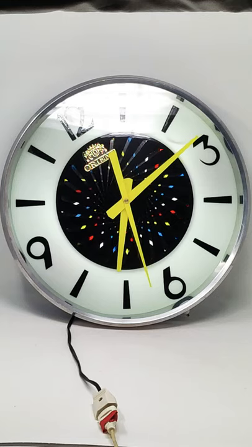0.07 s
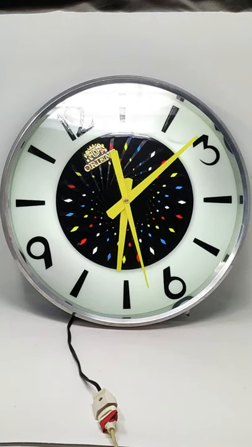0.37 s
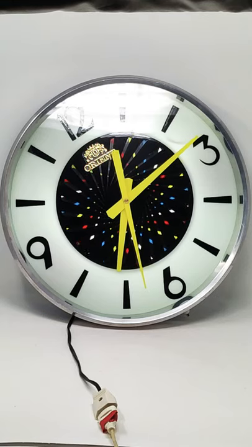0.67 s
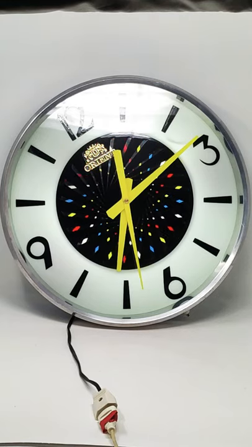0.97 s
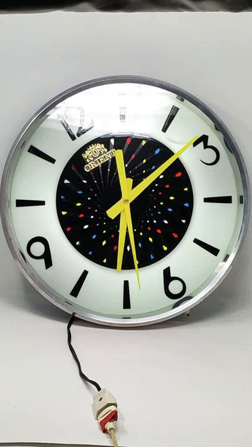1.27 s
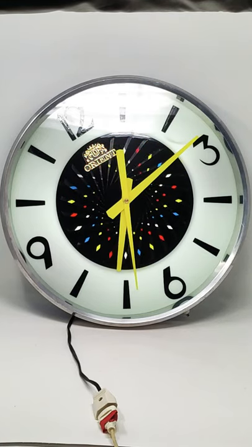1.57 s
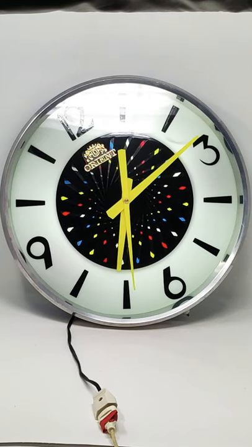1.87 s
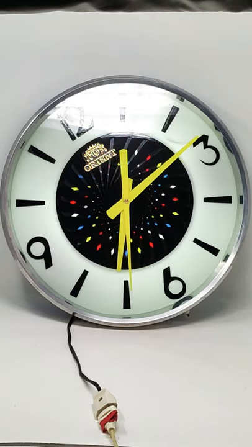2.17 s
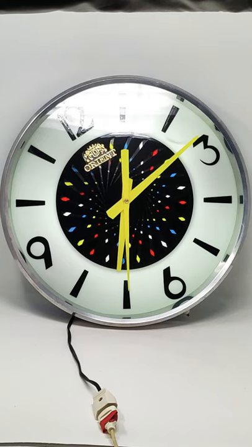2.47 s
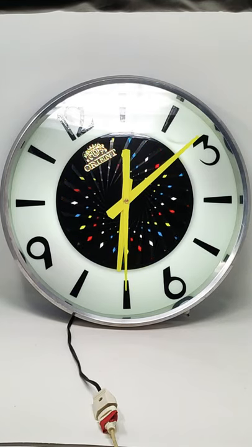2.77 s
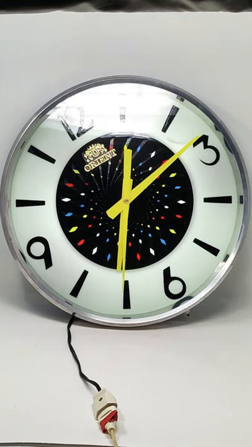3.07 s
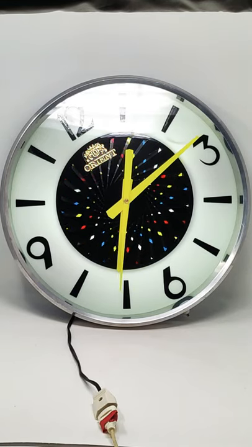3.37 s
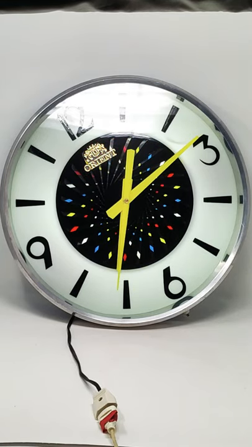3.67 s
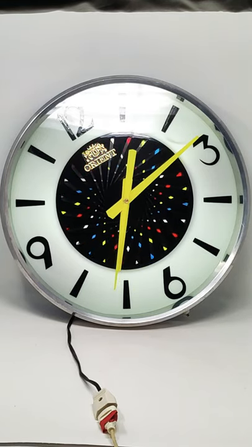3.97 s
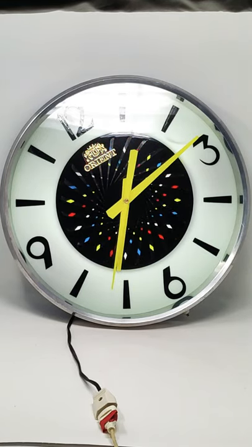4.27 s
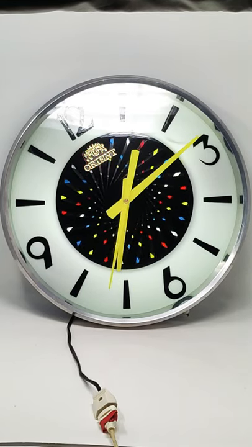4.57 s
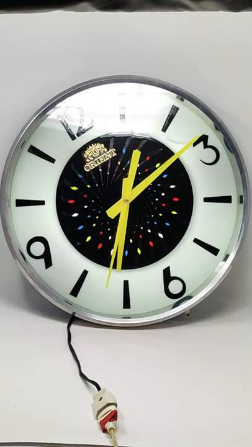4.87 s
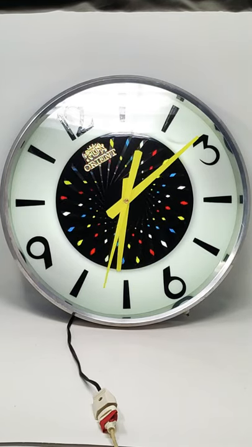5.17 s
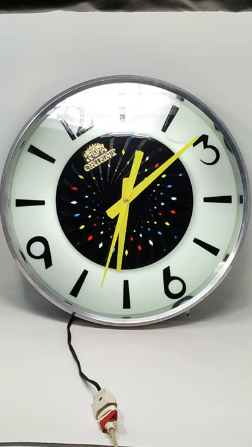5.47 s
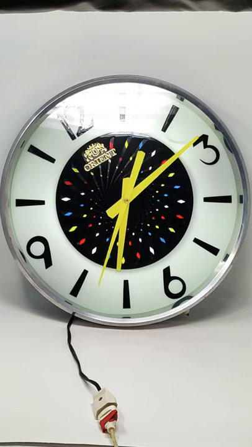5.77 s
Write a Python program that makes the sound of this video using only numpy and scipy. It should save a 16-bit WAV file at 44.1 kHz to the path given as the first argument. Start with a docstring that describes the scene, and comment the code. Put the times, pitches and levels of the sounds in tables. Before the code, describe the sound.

Close, uneven wind buffeting dominates, rumbling and popping mainly on the left side of the microphone. It drops briefly about two thirds of the way through and then returns. Behind it, indoors, a plug-in wall clock gives very faint metallic ticks, lower tocks and dry gear clicks over a slight hum and room hiss. One light snap sounds before the middle, and a tiny ping near the end.

```python
"""A quiet room with a plugged-in wall clock, and a draught blowing across the microphone's two ports.
Up front the air rumbles, thumps and flutters as eddies and gusts hit the ports, mostly the left one.
Far beneath it the clock ticks softly twice a second and tocks once a second, thin metal ringing with
each beat, while its gear teeth click dryly in the case. One sharper snap and one small ping stand out
from a bed of faint motor hum and room hiss."""
import sys
import numpy as np
from scipy import signal
from scipy.fft import rfft, irfft, next_fast_len
from scipy.io import wavfile
from scipy.ndimage import uniform_filter1d

SR = 44100
rng = np.random.default_rng(int(sys.argv[2]) if len(sys.argv) > 2 else 0)


def store_wav(level_fs):
    """Save 16-bit WAV to argv[1]."""
    pcm = np.round(np.clip(np.atleast_2d(level_fs), -1, 1) * 32767)
    wavfile.write(sys.argv[1], SR, pcm.T.astype(np.int16))


N = 265923
T = np.arange(N) / SR


def amp(db):
    """Decibels to gain."""
    return 10 ** (np.asarray(db) / 20)


def unit(x):
    """Scales to an rms of one."""
    return x / np.sqrt(np.mean(x ** 2) + 1e-20)


def colour(x, points):
    """An EQ curve through (Hz, dB) points joined on a log axis."""
    hz, db = np.transpose(points)
    f = np.fft.rfftfreq(x.shape[-1], 1 / SR)
    return irfft(rfft(x) * amp(np.interp(np.log(f + 1), np.log(hz), db)), x.shape[-1])


def noise(points, size=N):
    """Unrelated coloured noise for the two ports, with an rms of one."""
    return unit(colour(rng.standard_normal((2, next_fast_len(size))), points)[:, :size])


def wander(rate):
    """A smooth random modulator with an rms of one, up to about rate changes a second."""
    size = next_fast_len(N)
    f = np.fft.rfftfreq(size, 1 / SR)
    return unit(irfft(rfft(rng.standard_normal(size)) * np.exp(-(f / rate) ** 2), size)[:N])


def steadied(x, span):
    """Levels out swells slower than span seconds."""
    return x / np.sqrt(abs(uniform_filter1d(x ** 2, int(span * SR))) + 1e-6)


def swell(s, width):
    """A bell-shaped envelope of height one around s seconds."""
    return np.exp(-.5 * ((T - s) / width) ** 2)


def sides(pan_db):
    """Left and right gains of constant power."""
    gains = np.array([amp(pan_db / 2), amp(-pan_db / 2)]).reshape(2, -1)
    return gains / np.sqrt(np.mean(gains ** 2, 0))


def add(mix, s, sound):
    """Mixes a sound in at s seconds."""
    part = mix[..., max(round(s * SR), 0):][..., :sound.shape[-1]]
    part += sound[..., :part.shape[-1]]


# The colour of the room tone. Each row: frequency in Hz, relative level in dB.
ROOM_EQ = [(30, 22), (150, 13), (250, 16), (400, 9), (550, 4.5), (1000, 0.5), (2200, -2.5), (3200, -7.5),
           (4400, -12), (6000, -15), (8200, -12.5), (8800, -19.5), (10500, -21), (11300, -15.5),
           (13400, -13), (15000, -14.5)]


def room(level_db=-52, flicker_db=1.0):
    """A soft bed of hiss whose level flickers slightly."""
    return amp(level_db + flicker_db * wander(27)) * noise(ROOM_EQ)


# The tones of the hum. Each row: pitch in Hz, level in dB, pan as left minus right in dB.
HUM_TONES = [(213, -77.5, 8), (295.4, -57.5, -3.5), (389, -76.5, -8), (1146, -78, 23), (2460, -89.5, -8)]


def hum(waver_db=1.7, drift_hz=3.24):
    """The motor and the room hold faint tones that waver in pitch and level."""
    out = np.zeros((2, N))
    for hz, db, pan_db in HUM_TONES:
        turns = np.cumsum(hz + drift_hz * wander(6.84)) / SR + rng.random()
        out += sides(pan_db) * amp(db + waver_db * wander(4.4)) * np.sqrt(2) * np.sin(2 * np.pi * turns)
    return out


def click(points, t60, tail_db, tail_t60, rise_s, grain_db):
    """A burst of tiny uneven contacts that dies fast, and the room's tail."""
    t = np.arange(SR // 3) / SR
    decay = amp(-60 * t / t60) + amp(tail_db - 60 * t / tail_t60)
    attack = 1 - np.exp(-t / rise_s)
    contacts = rng.standard_normal((2, len(t)))
    contacts *= amp(grain_db * np.minimum(rng.exponential(1, contacts.shape), 4))
    return unit(colour(contacts, points)) * attack * decay


# The snap's cue: start in seconds, relative level in dB.
SNAP_CUE = (2.2549, -50.5)
# The snap's colour. Each row: frequency in Hz, relative level in dB.
SNAP_EQ = [(400, -4), (880, 2), (1150, 3.5), (1380, 11), (1600, 3.5), (1830, 11), (2100, -0.5), (2500, 1),
           (2780, -1), (3050, 4), (3450, 2.5), (3700, -6), (3880, -5), (4220, -21), (4500, -8.5),
           (5300, -8), (5800, -15), (6350, -6.5), (8000, -4.5), (9700, -17), (11800, -7), (13800, -8),
           (15500, -26.5)]


def snap():
    """One sharp, broad snap, heard mostly through the room."""
    out = np.zeros((2, N))
    s, db = SNAP_CUE
    burst = click(SNAP_EQ, t60=0.31, tail_db=-1.5, tail_t60=0.31, rise_s=0.00085, grain_db=1.5)
    add(out, s, amp(db) * burst)
    return out


# Teeth that catch and slip home with a clear click. Each row: start in seconds, relative level in dB.
TOOTH_CATCHES = [(0.131, -63.5), (0.3053, -60), (0.5138, -59), (0.703, -58), (0.915, -63.5), (1.1004, -64),
                 (1.505, -57.5), (2.9152, -54.5), (3.103, -55.5), (3.313, -55.5), (3.504, -59.5),
                 (3.7124, -57), (3.9105, -58), (4.014, -61), (4.21, -66), (4.4563, -60.5), (4.699, -57),
                 (5.1416, -58), (5.206, -61), (5.3138, -76)]
# The faint pulse of the other teeth: first pass in seconds, period in seconds.
TOOTH_PULSE = (0.311, 0.2)
# The bright colour of a tooth click. Each row: frequency in Hz, relative level in dB.
TOOTH_EQ = [(1200, -31.5), (2500, 2.5), (3500, 7), (5000, 8.5), (6700, 5.5), (8300, 3), (9500, -14),
            (11300, -6), (13000, -8.5), (15500, -28.5)]
# The clock case's resonances. Each row: centre in Hz, width in Hz, boost in dB before case_ring scales it.
CASE_MODES = [(3070, 50, 8.5), (3200, 50, 9.5), (3560, 42, 9.5), (3890, 51, 7.5), (4160, 87, 5.5),
              (4780, 32, 9), (5020, 71, 8), (5495, 50, 5), (5970, 50, 4), (6620, 55, 10.5), (6894, 54, 8),
              (8170, 160, 11), (9400, 120, 18), (11130, 130, 12)]


def gears(level_db=-4.5, case_ring=1.09, tooth_db=-65, between_db=-70, spread_db=0.7):
    """The wheels click dryly, with fainter clicks halfway between teeth; the case rings with each."""
    out = np.zeros((2, N))
    first, period = TOOTH_PULSE
    faint = [(s, (between_db if k % 2 else tooth_db) + spread_db * rng.standard_normal())
             for k, s in enumerate(np.arange(first, T[-1], period / 2))]
    for s, db in TOOTH_CATCHES + faint:
        tooth = click(TOOTH_EQ, t60=0.097, tail_db=-9.0, tail_t60=0.76, rise_s=0.0022, grain_db=7.5)
        add(out, s, amp(db + level_db) * tooth)
    f = np.fft.rfftfreq(N, 1 / SR)
    resonances = sum((amp(db) - 1) / (1 + 2j * (f - hz) / width) for hz, width, db in CASE_MODES)
    return irfft(rfft(out) * (1 + case_ring * resonances), N)


# Thin metal in the movement. Each row: ratio to the ring pitch, relative level in dB, t60 in seconds.
METAL_MODES = [(0.9, -7, 0.15), (0.953, -7, 0.37), (0.984, -5, 0.22), (1.005, -1.5, 0.2), (1.02, -2, 0.14),
               (1.106, -9, 0.26), (1.131, -8, 0.1)]


def strikes(rows, level_db, width_hz, t60, ring_db, lead_s=0.0095, lead_db=-6, tail_db=-8, tail_t60=0.33):
    """A light touch, then the hit itself: a narrow noise burst that leaves thin metal ringing."""
    out, t = np.zeros((2, N)), np.arange(SR // 3) / SR
    f = np.fft.rfftfreq(len(t), 1 / SR)
    after = np.maximum(t - lead_s, 0)
    attack = np.where(t < lead_s, amp(lead_db), 1) * np.minimum(t / 0.00073, 1)
    lag = np.array([[0], [np.pi / 2]])  # the ring reaches the right port a quarter cycle later
    for s, db, hz, pan_db in rows:
        band = 1 / (1 + 2j * (f - hz) / width_hz) ** 2
        band_noise = irfft(rfft(rng.standard_normal((2, len(t)))) * band, len(t))
        burst = steadied(unit(band_noise), span=0.012)
        burst *= amp(-60 * after / t60) + amp(tail_db - 60 * after / tail_t60)
        ring = sum(amp(ring_db + mode_db - 60 * after / decay) * np.sin(2 * np.pi * ratio * hz * t - lag)
                   for ratio, mode_db, decay in METAL_MODES)
        add(out, s - lead_s, amp(db + level_db) * sides(pan_db) * attack * (burst + ring))
    return out


def beats(first, period, hz, levels, detune=0.003, sway_db=-4.5):
    """Evenly spaced cues for strikes(), each nudged at random in pitch and pan."""
    starts = first + period * np.arange(len(levels))
    pitch, pan = rng.standard_normal((len(levels), 2)).T
    return list(zip(starts, levels, hz * (1 + detune * pitch), sway_db * pan))


# The clock's two pulses. Each gives: first beat in seconds, period in seconds, ring pitch in Hz.
TICK_PULSE = (0.55, 0.5015, 2565)
TOCK_PULSE = (0.399, 0.9995, 2105)
# Their accents. Each entry: one beat's relative level in dB.
TICK_ACCENTS = [-1.7, -2, 0.74, -1, 1, 1, -1.1, 0.28, 0.92, -1, 0.5]
TOCK_ACCENTS = [-2.5, -7, -1, -1, -4]
# The ping. Its row: time in seconds, relative level in dB, ring pitch in Hz, left minus right in dB.
PING_CUE = [(5.838, -69.5, 3130, 0)]


def movement():
    """The clock beats with a ringing tick and a lower, drier tock; a small part pings once."""
    tick = strikes(beats(*TICK_PULSE, TICK_ACCENTS), level_db=-68.0, width_hz=430, t60=0.22, ring_db=12.5)
    tock = strikes(beats(*TOCK_PULSE, TOCK_ACCENTS), level_db=-64.5, width_hz=400, t60=0.055, ring_db=6.0)
    ping = strikes(PING_CUE, level_db=-1.0, width_hz=800, t60=0.1, ring_db=7.0)
    return tick + tock + ping


# Short vortex trains. Each row: centre in seconds, level in dB, pitch in Hz, half length in seconds.
VORTEX_TRAINS = [(0.414, -35.5, 320, 0.0079), (0.995, -24.5, 300, 0.0051), (1.868, -17, 178, 0.015),
                 (1.87, -34, 380, 0.0071), (1.988, -15, 347, 0.002), (3.3907, -14, 342, 0.0017),
                 (4.7055, -13, 347, 0.0013), (5.193, -31.5, 562, 0.0029)]


def flutter(sag_per_s=6):
    """Vortices shed at a slowing rate give brief hollow notes at the left port."""
    left = np.zeros(N)
    for s, db, hz, width in VORTEX_TRAINS:
        turns = hz * (1 - np.exp(-sag_per_s * np.clip(T - s, -.1, .1))) / sag_per_s
        left += amp(db) * swell(s, width) * np.cos(2 * np.pi * turns)
    return np.array([left, np.zeros(N)])


# Gusts that hit the left port. Each row: time in seconds, relative peak in dB, sharpness in Hz.
GUSTS = [(0.283, -13, 154.5), (0.428, -11, 135), (0.55, -8, 156), (0.562, -12.5, 144.5), (0.602, -8, 113),
         (0.717, -11.5, 106.6), (0.775, -10.5, 69), (0.836, -4, 93.5), (0.991, -8.5, 159),
         (1.0042, -4.5, 225), (1.019, -6.5, 116.5), (1.0306, -2.5, 108), (1.068, -12.5, 111),
         (1.104, -13, 214), (1.122, -7.5, 183), (1.257, -18.5, 213), (1.55, -11.5, 126.6),
         (1.574, -15, 244), (1.666, -10.5, 212), (1.675, -3.5, 97), (1.699, -17, 233), (1.922, -6.5, 119.6),
         (1.9941, -7, 175), (2.004, 0, 258), (2.062, -8, 93), (2.158, -5.5, 170), (2.19, -9.5, 223),
         (2.199, -8.5, 170), (2.214, -12.5, 170.5), (2.336, -14.5, 94.6), (2.566, -15, 180),
         (2.591, -7.5, 171), (2.6, -7.5, 112.4), (2.613, -9, 129), (2.659, -10, 139), (2.673, -5.5, 136),
         (2.688, -4.5, 197), (2.724, -7, 116), (2.748, -19.5, 201), (2.764, -4, 58.7), (2.901, -12.5, 188),
         (3.039, -11.5, 165), (3.227, -7.5, 123), (3.287, -16.5, 90.5), (3.333, -8, 184.4),
         (3.363, -10.5, 194), (3.3895, -8, 251), (3.434, -5.5, 128), (3.458, -14.5, 91), (3.502, -3, 338),
         (3.512, -3.5, 219), (3.616, -20.5, 188.5), (3.634, -9.5, 76.3), (3.649, -8, 181), (3.675, -5, 113),
         (3.718, -11.5, 165), (3.738, -15, 170), (3.794, -7, 74), (3.933, -11.5, 143.4), (4.094, -14, 61),
         (4.141, -11.5, 59.6), (4.304, -15.5, 168), (4.465, -7, 109.3), (4.669, -9, 119.3),
         (4.7059, -6.5, 273), (4.728, -9, 236), (4.756, -10.5, 167.5), (4.84, -9.5, 180.4),
         (4.851, -8, 136.6), (4.882, -12, 181), (5.021, -6.5, 110), (5.047, -8, 182), (5.066, -6, 103),
         (5.119, -8.5, 116), (5.191, -7, 159.4), (5.214, -12, 185), (5.227, -8, 141.5), (5.264, -9, 134),
         (5.289, -12, 119), (5.344, -14.5, 139), (5.364, -12, 183.4), (5.396, -8, 169), (5.428, -9, 102.5),
         (5.483, -7, 93.5), (5.743, -10.5, 145), (5.76, -9.5, 152), (5.785, -14.5, 201),
         (5.957, -6.5, 138.5)]


def thumps(level_db=-1.5, leak_hz=40, right_db=-30, finest_ratio=6.62, finest_growth=0.46, lean=0.19):
    """Each gust is a rounded, slightly lopsided cusp of pressure; the port leaks, so a dip follows."""
    pressure, size = np.zeros(N), 4096
    f = np.fft.rfftfreq(size, 1 / SR)
    for s, db, hz in GUSTS:
        top_hz = finest_ratio * hz * amp(finest_growth * db)  # sharper, stronger gusts shed finer swirls
        cusp = np.fft.fftshift(irfft(np.exp(-f / hz - (f / top_hz) ** 3 - 1j * lean)))
        add(pressure, s - size / 2 / SR, amp(db) * cusp / cusp.max() * np.hanning(size))
    leaked = signal.lfilter(*signal.butter(1, leak_hz, "high", fs=SR), pressure)
    return amp(level_db) * leaked * amp([[0], [right_db]])


def gust_swells(push_db=-12.0, wake_db=-27, width_s=0.01508, lead_s=0.0024, pivot_hz=140, wake_tilt=0.53):
    """Power envelopes around the gusts: blunt ones push the rumble, sharp ones stir a wake of eddies."""
    push, wake = np.zeros((2, N))
    for s, db, hz in GUSTS:
        power = (amp(db) * swell(s - lead_s, width_s)) ** 2
        push += power * amp(push_db) ** 2 * pivot_hz / hz
        wake += power * (amp(wake_db) * (hz / pivot_hz) ** wake_tilt) ** 2
    return push, wake


# The draught's fader rides, overall and at the sheltered right port.
# Each row: time in seconds, relative level in dB.
DRAUGHT_RIDE = [(0.15, -23), (0.45, -19.5), (1.05, -18), (1.15, -22.5), (1.45, -20), (1.85, -17.5),
                (2.4, -20), (2.65, -18.5), (3.1, -18.5), (3.3, -15), (3.75, -17.5), (3.88, -25.5),
                (4.05, -26), (4.35, -26.5), (4.58, -25.5), (4.75, -17.5), (5.45, -17), (5.6, -22),
                (5.9, -17.0), (6.02, -22.5)]
LEE_RIDE = [(0.2, -43.5), (0.7, -35.5), (1.0, -35.5), (2.9, -40), (3.4, -30), (3.9, -34), (4.15, -41.5),
            (4.4, -32.5), (4.85, -44), (5.2, -28), (5.6, -38.5), (6.0, -50)]
# Puffs that reach round to the right port. Each row: centre in seconds, relative level in dB.
LEE_PUFFS = [(0.585, -19), (2.055, -23.5), (3.06, -29), (3.45, -33), (3.71, -36), (4.04, -23), (4.71, -30),
             (5.27, -33)]
# The colours of the large and the small eddies. Each row: frequency in Hz, relative level in dB.
RUMBLE_EQ = [(8, 2), (20, -7.5), (36, 2), (65, -2), (95, -4), (130, -10.5), (180, -19), (300, -50.5),
             (600, -100.5)]
EDDY_EQ = [(60, -23), (110, -4.5), (150, 5.5), (200, 1), (300, -15.5), (450, -26), (600, -33), (900, -48),
           (1600, -105)]
# Shelter lets only the largest eddies through. Each row: frequency in Hz, gain in dB.
LEE_EQ = [(40, 4), (80, 3), (130, -4), (220, -11.5)]


def draught(usual_db=-21, rumble_db=-3.5, rumble_follow=0.72, eddies_db=-42.5, eddies_follow=1.5,
            right_db=-4.0, shelter_db=9, puff_s=0.021, lumpy_db=3.5, quicken=0.033, gust_share=0.32):
    """Large eddies rumble at both ports; small ones clump around sharp gusts, mostly on the left."""
    strength_db = np.interp(T, *np.transpose(DRAUGHT_RIDE)) - usual_db
    push, wake = gust_swells()
    lumps_db = lumpy_db * wander(30)
    left_gain = np.sqrt(amp(usual_db + rumble_db + rumble_follow * strength_db) ** 2 + push)
    puffs = sum(amp(db) * swell(s, puff_s) for s, db in LEE_PUFFS)
    lee_gain = amp(np.interp(T, *np.transpose(LEE_RIDE))) + puffs
    exposed, sheltered = steadied(noise(RUMBLE_EQ) * amp(lumps_db), span=0.0845)
    large = np.array([exposed * left_gain, colour(sheltered, LEE_EQ) * lee_gain * amp(right_db)])
    small_db = 10 * np.log10(amp(eddies_db + eddies_follow * strength_db) ** 2 + wake)
    # faster air sweeps the eddies past sooner, so louder is also brighter
    speed = np.exp(quicken * (lumps_db + gust_share * (small_db - small_db.mean())))
    eddies = noise(EDDY_EQ, size=2 * N)
    swept = np.array([np.interp(np.cumsum(speed), np.arange(2 * N), port) for port in eddies])
    small = steadied(swept * amp(lumps_db), span=0.12) * amp(small_db)
    small[1] *= lee_gain / left_gain * amp(-shelter_db)
    return large + small


def ports(air, ceiling=0.82, round_hz=2600):
    """The narrow ports choke the strongest puffs and round their edges."""
    choked = air / (1 + (air / ceiling) ** 6) ** (1 / 6)
    return signal.sosfiltfilt(signal.butter(4, round_hz, fs=SR, output="sos"), choked)


# The right port's scoop in the upper treble. Each row: frequency in Hz, gain in dB.
RIGHT_PORT_EQ = [(3000, -0.5), (5000, -2), (6500, -6.5), (7500, -23), (8500, -23.5), (9200, 0),
                 (12000, -1.5)]


def scene():
    """Clock and room reach both ports through the air; the draught acts on the ports themselves."""
    left, right = movement() + gears() + snap() + hum() + room()
    wind = ports(draught() + thumps() + flutter())
    return np.array([left, colour(right, RIGHT_PORT_EQ)]) + wind


def record(dry, edge_hz=15550):
    """The master: a quick fade in to a 2 dB lift, a 4 ms fade out and a steep high cut."""
    fade_db = np.interp(T, [0, .065, .09, .14, .24], [-58.0, -57, -9.0, -1.5, 2.0])
    fade_out = np.minimum((T[-1] - T) / .004, 1)
    high_cut = signal.firwin(511, edge_hz, window=("kaiser", 9), fs=SR)
    return signal.oaconvolve(dry * amp(fade_db) * fade_out, high_cut[None], "same")


dry = scene()
out = record(dry)
store_wav(out)
```